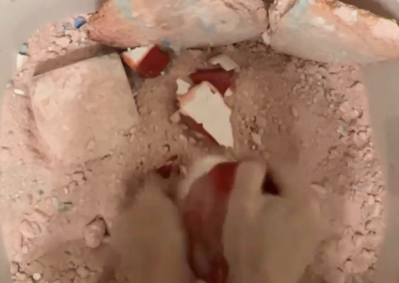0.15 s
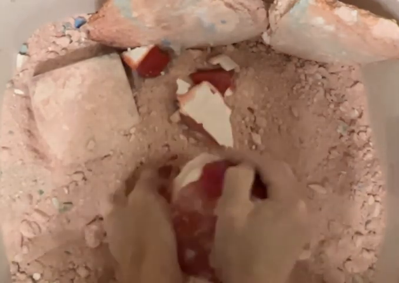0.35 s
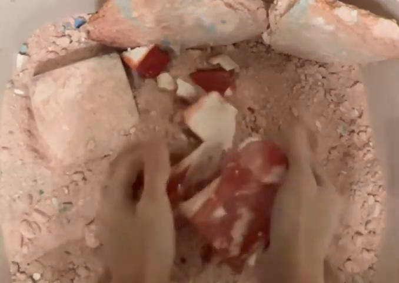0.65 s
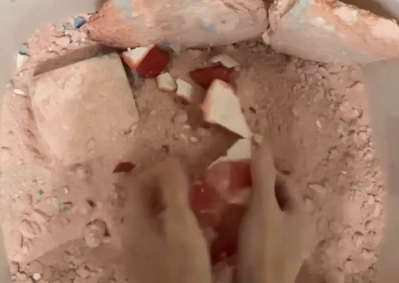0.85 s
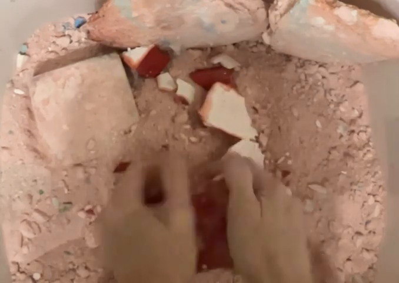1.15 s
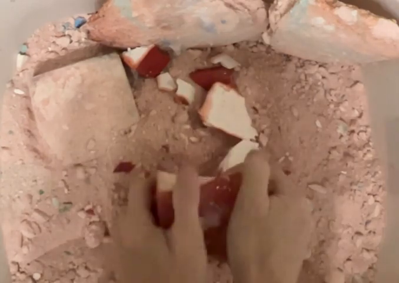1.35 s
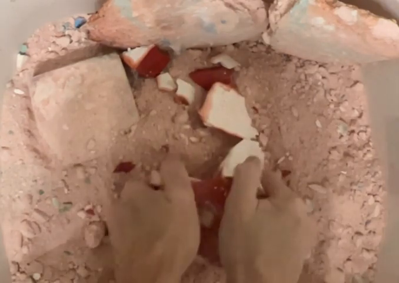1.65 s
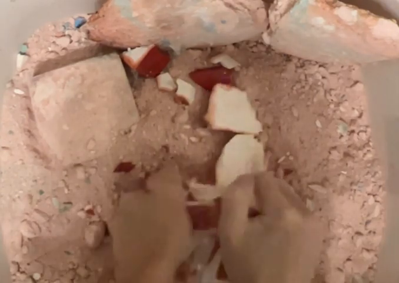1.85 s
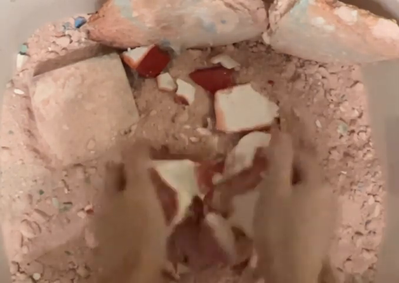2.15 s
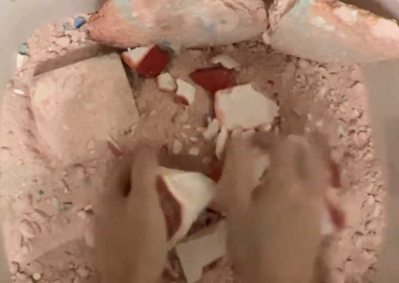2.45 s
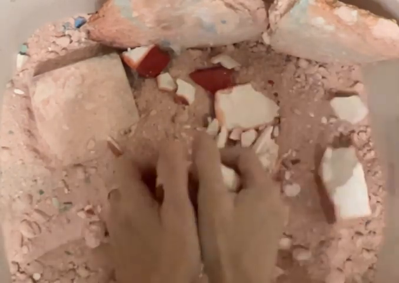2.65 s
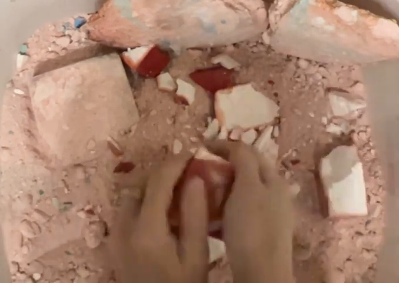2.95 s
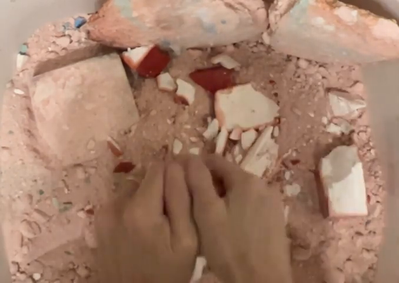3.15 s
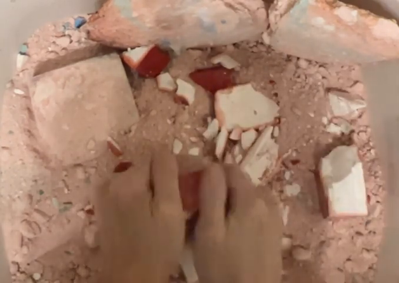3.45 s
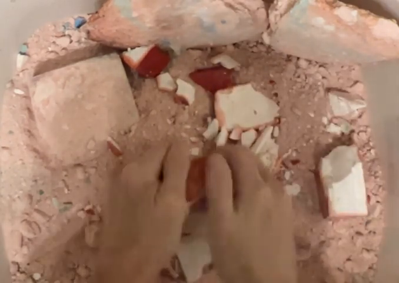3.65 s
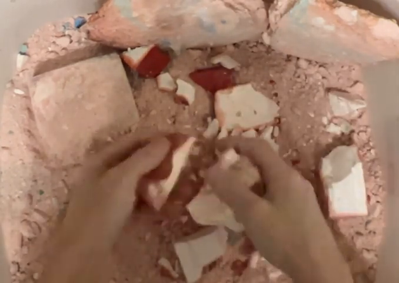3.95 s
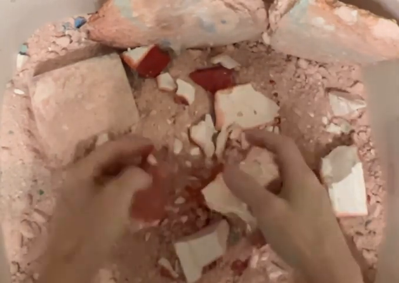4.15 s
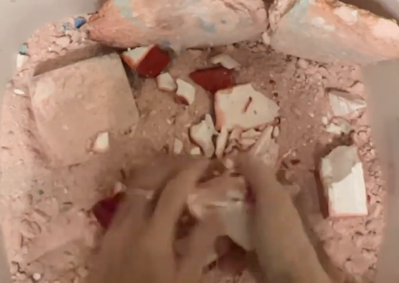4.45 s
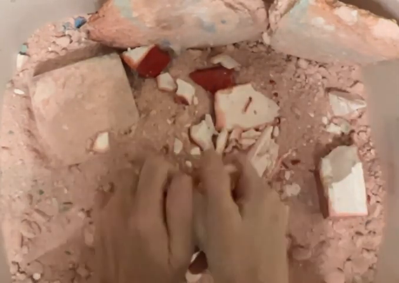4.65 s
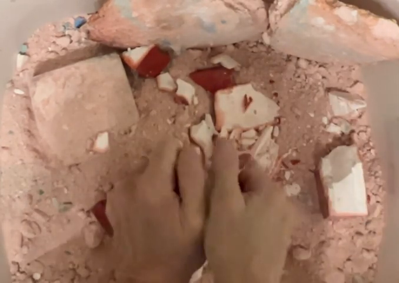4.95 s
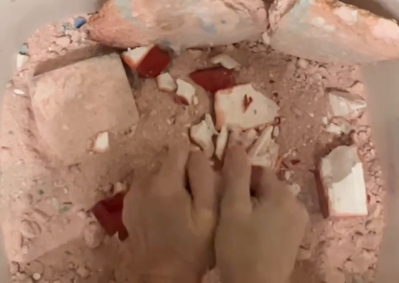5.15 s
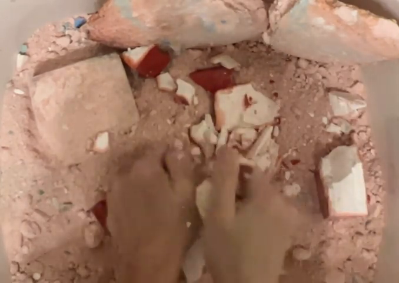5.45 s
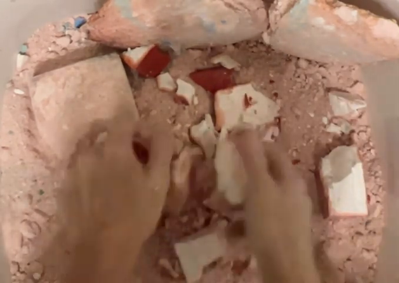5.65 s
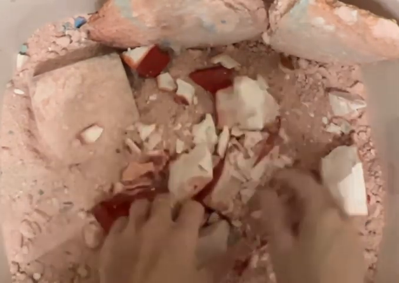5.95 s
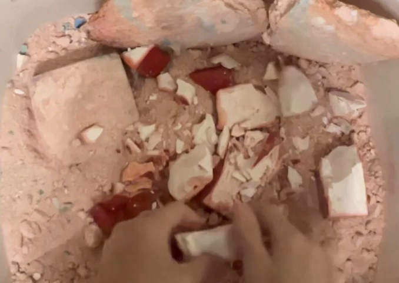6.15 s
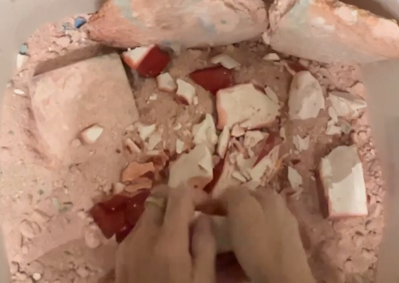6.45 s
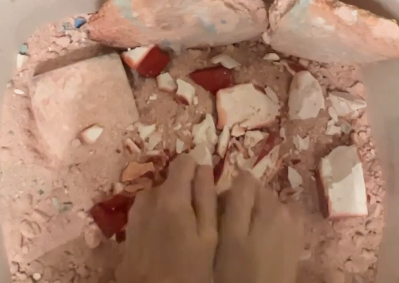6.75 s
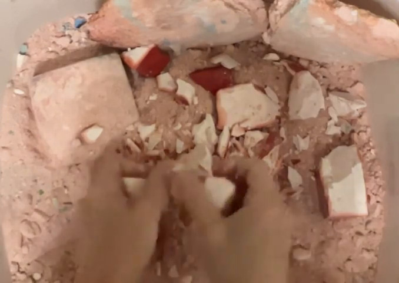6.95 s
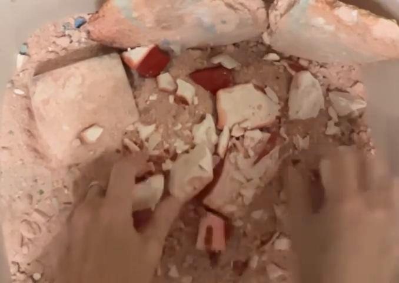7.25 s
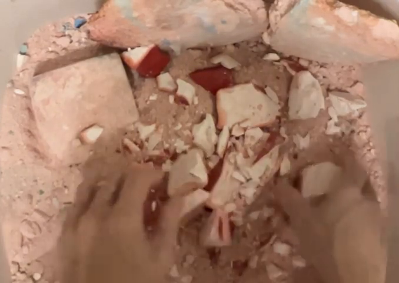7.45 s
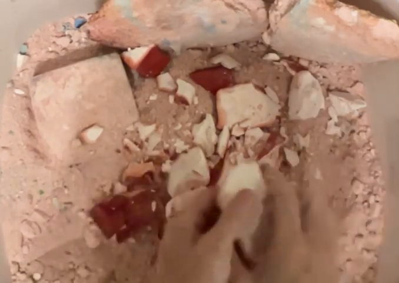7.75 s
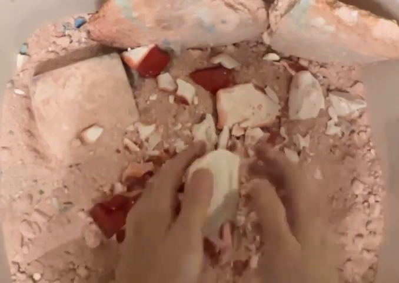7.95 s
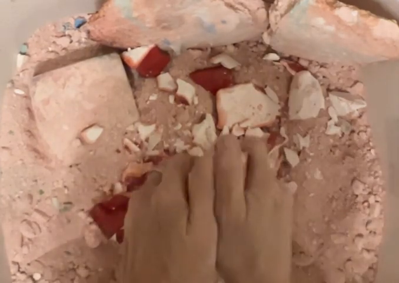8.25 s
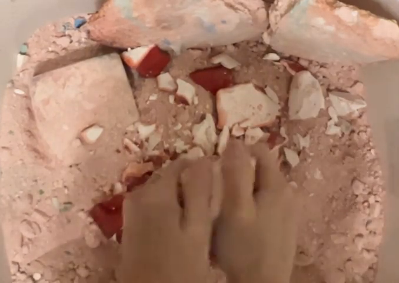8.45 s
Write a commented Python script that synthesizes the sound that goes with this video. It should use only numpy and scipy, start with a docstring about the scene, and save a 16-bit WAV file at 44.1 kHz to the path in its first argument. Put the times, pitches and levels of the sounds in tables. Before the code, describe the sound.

Chalk blocks crack and crumble between fingers, with small ticks, powdery rustles and dull knocks over a faint hum.

```python
"""Breaking chalk by hand

Close under a microphone, hands snap and crumble blocks of chalk over a tub of loose powder.
Each brittle fracture excites the modes of block and tub and sheds crumbs; pieces land with dull
knocks. Fingers rustle the dust and once draw a faint squeak. Moving air buffets the microphone
over a faint mains hum and the hiss of the room."""
import sys
import numpy as np
from scipy import signal
from scipy.fft import rfft, irfft, next_fast_len
from scipy.io import wavfile
from scipy.ndimage import uniform_filter1d

SR = 44100
rng = np.random.default_rng(int(sys.argv[2]) if len(sys.argv) > 2 else 0)


def log_audio(samples):
    """Write samples as a 16-bit WAV file to the path given in sys.argv[1]."""
    # one column per channel
    frames = np.atleast_2d(samples).T
    # limit to full scale, then quantise
    limited = np.clip(frames, -1, 1)
    pcm = np.round(limited * 32767).astype(np.int16)
    wavfile.write(sys.argv[1], SR, pcm)


N = 379260
CONTROL_STEP, EVENT_SAMPLES = 96, 8192  # samples per control value and per snap or knock


def gain_of(db):
    """The decibel law: a factor of ten in amplitude for every 20 dB."""
    return 10 ** (np.asarray(db) / 20)

def unit_rms(x):
    """Normalisation to unit mean power."""
    return x / np.sqrt(np.mean(x ** 2) + 1e-20)

def unit_peak(x):
    """Normalisation to unit power in the loudest 4 ms."""
    return x / np.sqrt(uniform_filter1d(x ** 2, 180).max())

def curve(rows, column):
    """Linear interpolation of one column over the times in the first."""
    rows = np.vstack(rows)
    return np.interp(np.arange(N) / SR, rows[:, 0], rows[:, column])

def upsample(control):
    return np.interp(np.arange(N) / CONTROL_STEP, np.arange(len(control)), control)

def wander(cutoff_hz):
    """Random modulation: low-passed noise of unit power."""
    lowpass = signal.butter(N=2, Wn=cutoff_hz, fs=SR, output="sos")
    return unit_rms(signal.sosfilt(lowpass, rng.standard_normal(N)))

def colour(x, spectrum):
    """Spectral shaping through (Hz, dB) points, silent beyond their ends."""
    size = next_fast_len(len(x) + 256)
    hz = np.fft.rfftfreq(size, 1 / SR)
    points_hz, points_db = np.transpose(spectrum)
    db = np.interp(np.log(hz + 1), np.log(points_hz + 1), points_db)
    inside = (hz > points_hz[0]) & (hz < points_hz[-1])
    return irfft(rfft(x, size) * gain_of(db) * inside, size)[:len(x)]

def resonate(x, hz, width_hz):
    """A damped mode: a two-pole resonator, whose bandwidth sets its decay."""
    radius = np.exp(-np.pi * width_hz / SR)
    return signal.lfilter([1, 0, -1], [1, -2 * radius * np.cos(2 * np.pi * hz / SR), radius ** 2], x)

def ring(x, modes, detune):
    """Modal superposition: one force drives several resonances in parallel."""
    return sum(gain_of(db) * resonate(x, hz * ratio, width)
               for (hz, width, db), ratio in zip(modes, detune))


# Room hiss. Each row: frequency in Hz, relative spectral density in dB.
HISS_SPECTRUM = [(62, -31.5), (105, -9), (294, -14.5), (791, -23.5), (1370, -31), (1550, -29),
                 (2310, -38), (12700, -48), (16000, -49)]
HUM_HZ, HUM_DB, HISS_DB = 120.3, -60.5, -63

def room():
    """The noise floor: a slightly wavering mains hum over stationary hiss."""
    cycles = np.cumsum(HUM_HZ + 0.2 * wander(9)) / SR
    hum = np.sqrt(2) * gain_of(HUM_DB + 0.48 * wander(3.1)) * np.sin(2 * np.pi * cycles)
    return hum + gain_of(HISS_DB) * unit_rms(colour(rng.standard_normal(N), HISS_SPECTRUM))


# Eddies at the microphone. Each row: frequency in Hz, relative spectral density in dB.
EDDY_SPECTRUM = [(8.8, -28.5), (15, -7), (38, 4), (64, -1), (122, -6), (201, -29), (300, -34.5), (390, -62),
                 (660, -120)]
# Air between gusts. Each row: time in seconds, level in dB.
DRAUGHT = [(0.0, -74.5), (0.95, -65.5), (1.05, -78.5), (1.5, -72), (1.7, -54.5), (2.6, -57.5), (4.3, -57),
           (4.5, -66.5), (5.0, -71.5), (5.8, -74), (6.2, -60), (6.65, -61), (6.9, -45), (8.35, -50),
           (8.5, -67.5)]
# Gusts from the moving hands. Each row: peak time in seconds, level in dB,
# seconds to rise or fall by 20 dB (taken as at least 0.04).
GUSTS = [(1.93, -36.5, .06), (2.14, -41, 0.2), (2.8, -43, 0.14), (3.03, -33, 0.07), (3.21, -36.5, 0.16),
         (3.52, -42.5, 0.14), (3.73, -37, 0.09), (3.931, -35.5, 0.23), (4.099, -42.5, 0.06),
         (4.27, -43, .05), (4.38, -44.5, 0.15), (5.91, -54, 0), (6.25, -48, 0.48), (6.455, -33, 0.04),
         (6.96, -36, 0.02), (7.069, -28, -0.015), (7.395, -30.5, 0.04), (7.58, -41.5, 0.33),
         (7.701, -33, 0.01), (8.01, -40, 0.2), (8.12, -46.5, 0.4), (8.27, -39.5, .07), (8.391, -41, -0.06)]
# Lulls in the air. Each row: centre in seconds, depth in dB, half length in seconds.
LULLS = [(3.424, 13, 0.024), (7.942, 16, 0.05)]

def air():
    """Turbulence: low pressure swings at the microphone port swell and brighten with each gust."""
    eddies = colour(rng.standard_normal(N), EDDY_SPECTRUM)
    steady = eddies / np.sqrt(uniform_filter1d(eddies ** 2, 3500) + 1e-12)
    t = np.arange(0, N + CONTROL_STEP, CONTROL_STEP) / SR
    gust_power = sum(gain_of(db - 20 * abs(t - at) / max(fall_s, .04)) ** 2 for at, db, fall_s in GUSTS)
    lull_db = sum(db * np.exp(-((t - at) / half_s) ** 2) for at, db, half_s in LULLS)
    level = np.sqrt(gain_of(curve(DRAUGHT, column=1)) ** 2 + upsample(gust_power))
    flutter = signal.sosfilt(signal.butter(N=2, Wn=75, btype="high", fs=SR, output="sos"), steady)
    brightening = 0.5 * ((level / gain_of(-34)) ** 0.24 - .7)
    pressure = unit_rms(steady) + brightening * unit_rms(flutter)
    return level * gain_of(2.8 * wander(14) - upsample(lull_db)) * pressure


def squeak(start_s=2.87, end_s=3.2, from_hz=1120, to_hz=1660, level_db=-67.5):
    """Friction of skin on chalk: a rising tone, made breathy by random amplitude modulation."""
    progress = np.clip((np.arange(N) / SR - start_s) / (end_s - start_s), 0, 1)
    cycles = np.cumsum(from_hz + (to_hz - from_hz) * progress) / SR
    envelope = gain_of(level_db) * np.sqrt(np.sin(np.pi * progress).clip(0))
    return envelope * (1 + .5 * wander(cutoff_hz=86)) * np.sin(2 * np.pi * cycles)


def grains(per_s, spread_db, clump_db):
    """Shot noise: tiny contacts of uneven size, swelling in clumps."""
    size = gain_of(spread_db * rng.exponential(1, N).clip(0, 5)) * rng.standard_normal(N)
    return size * (rng.random(N) < per_s / SR) * gain_of(clump_db * wander(35))

def patchy(x, depth_db):
    """Spectral modulation: random patches of time and frequency are lifted or lowered."""
    _, _, spectra = signal.stft(x, SR, nperseg=256)
    across_pitch = uniform_filter1d(rng.standard_normal(spectra.shape), 4, axis=0)
    patches = unit_rms(uniform_filter1d(across_pitch, 16, axis=1))
    return signal.istft(spectra * gain_of(depth_db * patches), SR, nperseg=256)[1][:N]

def grit(activity, per_s=220):
    """A Poisson process: single grains tick on random pitches, louder where the hands are busy."""
    out, t = np.zeros(N), np.arange(300) / SR
    impacts = gain_of(4.2 * rng.exponential(1, N).clip(0, 3)) * (rng.random(N) < per_s / SR) * activity
    pitch_index = rng.integers(0, 16, N)
    envelope = np.exp(-t / .0005) * np.minimum(t / .0002, 1)
    for k, hz in enumerate(np.geomspace(1100, 7500, num=16)):
        tick = envelope * (np.sin(2 * np.pi * hz * t) + .3 * rng.standard_normal(len(t)))
        out += signal.oaconvolve(impacts * (pitch_index == k), tick)[:N]
    return out

def burst_power(start_s, length_s, level_db, attack_s, release_db_per_s):
    """Incoherent addition: the summed power of attack-hold-release envelopes."""
    t = np.arange(0, N + CONTROL_STEP, CONTROL_STEP)[:, None] / SR - start_s
    envelope_db = level_db - release_db_per_s * np.maximum(t - length_s, 0)
    envelopes = gain_of(envelope_db) * np.clip(t / attack_s, 0, 1)
    return upsample((envelopes ** 2).sum(axis=1))

# Fingers resting in the dust. Each row: time in seconds, dust level in dB, crumb level in dB.
RESTING_CONTACT = [(0.0, -66, -64.5), (0.5, -71, -68.5), (0.68, -68.5, -57.5), (0.95, -62, -61),
                   (1.37, -72, -73), (1.7, -69, -65), (2.2, -71, -62.5), (2.5, -72.5, -71.5),
                   (3.15, -69.5, -65), (3.3, -76, -69), (3.9, -65.5, -65), (4.4, -75.5, -71.5),
                   (4.85, -75.5, -63.5), (5.6, -73, -67), (6.1, -71.5, -65.5), (7.2, -76.5, -68),
                   (7.62, -77.5, -75), (8.0, -67.5, -71), (8.6, -78, -71)]
# Rubs and squeezes. Each row: start and length in seconds, dust level in dB, crumb level in dB.
RUBS = [(0.84, 0.013, -57.5, -60), (0.973, 0.074, -65, -62), (1.037, 0.13, -51, -86),
        (1.249, 0.077, -57.5, -65), (1.396, 0.12, -61, -66), (1.56, 0.051, -57, -57.5),
        (2.04, 0.042, -66, -73), (2.21, 0.034, -65, -58.5), (2.326, 0.046, -63, -53),
        (2.537, 0.054, -65.5, -74), (2.61, 0.024, -61.5, -68.5), (2.758, 0.084, -62.5, -80),
        (2.912, .13, -65, -79), (3.066, .11, -63.5, -63.5), (3.721, 0.021, -62.5, -67.5),
        (3.854, 0.069, -63, -67.5), (4.237, 0.077, -75.5, -58), (4.463, 0.017, -57, -73),
        (4.544, 0.023, -59.5, -81.5), (4.721, .07, -65, -61.5), (4.813, 0.029, -61, -64),
        (5.072, 0.048, -64.5, -57.5), (5.675, 0.11, -61, -60.5), (5.926, 0.051, -77, -61.5),
        (6.186, 0.019, -66, -60.5), (6.247, 0.13, -68, -74.5), (6.393, 0.026, -57, -69),
        (6.576, 0.045, -61.5, -61.5), (6.774, 0.07, -67, -59.5), (6.857, 0.04, -62, -64.5),
        (6.972, 0.04, -56.5, -68.5), (7.132, 0.039, -76.5, -57.5), (7.31, 0.072, -57, -52),
        (7.402, 0.11, -61.5, -59), (7.727, 0.015, -50.5, -65.5), (7.776, 0.04, -60.5, -64.5),
        (7.996, 0.032, -63.5, -70.5), (8.088, 0.02, -62.5, -68.5), (8.228, 0.011, -57.5, -60),
        (8.28, 0.065, -61.5, -69), (8.444, 0.043, -63, -61)]

def rustle_level(column, debris_db):
    """Power summation of resting contact, rubs and debris, whose level is relative to each snap."""
    rubs, breaks = np.transpose(RUBS), np.transpose(SNAPS)
    rubbing = burst_power(rubs[0], rubs[1], rubs[column + 1], attack_s=0.008, release_db_per_s=526)
    debris = burst_power(breaks[0], 0.029, breaks[1] + debris_db, attack_s=0.0054, release_db_per_s=131)
    return np.sqrt(gain_of(curve(RESTING_CONTACT, column)) ** 2 + rubbing + debris)

# Fine dust and coarse crumbs. Each row: frequency in Hz, relative spectral density in dB.
DUST_SPECTRUM = [(1470, -36.5), (2500, -8), (5150, -6), (5750, 0), (7300, -4.5), (9510, -3), (13000, -6),
                 (15500, -9), (16500, -17)]
CRUMB_SPECTRUM = [(200, -17.5), (450, 4), (1000, -1.5), (2200, -4), (3500, -5.5), (6000, -20.5)]

def rustle():
    """Granular noise: dust hisses between the fingers and crumbs patter on the powder bed."""
    dust = colour(patchy(grains(12000, spread_db=2.5, clump_db=1.8), depth_db=3), DUST_SPECTRUM)
    crumbs = colour(patchy(grains(7000, spread_db=2.8, clump_db=2.2), depth_db=3), CRUMB_SPECTRUM)
    dust_level = rustle_level(column=1, debris_db=-45.5)
    crumb_level = rustle_level(column=2, debris_db=-43.5)
    ticks = gain_of(1.5) * grit(.5 * dust_level + crumb_level)
    return dust_level * unit_rms(dust) + crumb_level * unit_rms(crumbs) + ticks


def knock(level_db, hz, t60):
    """A soft impact: a blunt, lumpy force excites three low modes of the powder bed."""
    cycles = np.arange(EVENT_SAMPLES) / SR * hz  # a bigger piece settles more slowly
    quarter_period = int(SR / hz / 4)
    noise = rng.standard_normal(EVENT_SAMPLES)
    lumps = unit_rms(uniform_filter1d(uniform_filter1d(noise, quarter_period), quarter_period))
    push = 1.4 * cycles * np.exp(-cycles / 0.29)
    settling = 0.388 * lumps * np.exp(-cycles / 2.0) * np.minimum(cycles / 1.6, 1)
    width_hz = 2.2 / t60
    modes = [(hz, width_hz, 0), (hz * 1.36, width_hz * 2.04, -2.5), (hz * 2.2, width_hz * 3, -14)]
    bed = sum(gain_of(db) * unit_peak(resonate(push + settling, f, width)) for f, width, db in modes)
    return gain_of(level_db - 8.0) * unit_peak(bed)

def place(sound, events):
    """Linear superposition: one sound for each row, added at its start time."""
    out = np.zeros(N + EVENT_SAMPLES)
    for start_s, *settings in events:
        out[round(start_s * SR):][:EVENT_SAMPLES] += sound(*settings)
    return out[:N]

# Knocks on the bed. Each row: start in seconds, relative level in dB,
# frequency of the lowest mode in Hz, its 60 dB decay time in seconds.
KNOCKS = [(0.963, -35.5, 604, 0.015), (1.963, -36.5, 397, 0.038), (2.228, -43.5, 556, 0.017),
          (2.256, -42, 760, 0.014), (2.416, -45.5, 620, 0.01), (2.695, -28, 354, 0.033),
          (3.45, -17.5, 474, 0.032), (4.252, -43.5, 774, 0.042), (5.219, -37, 660, 0.01),
          (5.296, -18.5, 450, 0.024), (5.798, -38, 443, 0.019), (5.925, -35, 438, 0.021),
          (7.154, -31.5, 435, 0.02), (7.24, -39, 385, 0.033), (7.314, -15.5, 314, 0.063),
          (7.338, -31.5, 328, 0.04)]

def knocks():
    """Impact excitation: dropped pieces and hard breaks jolt the powder bed."""
    return place(knock, KNOCKS)


# Modes of the block, and of the tub with its powder. Each row: frequency and width in Hz, gain in dB.
CHALK_MODES = [(1650, 130, -6.5), (2130, 400, 9), (3040, 530, 6), (4460, 540, -15)]
TUB_MODES = [(343.8, 710, 4), (450, 47, -2.5), (697, 87, -4)]
# The bright hiss of a crack. Each row: frequency in Hz, relative spectral density in dB.
CRACK_SPECTRUM = [(2500, -20.5), (4500, -2), (7000, -6.5), (10000, -8.5), (14000, -10), (17000, -11.5)]
FRACTURE_S, FRACTURE_EXPONENT = 0.0032, 0.46  # fracture time of a 1500 Hz piece; smaller ones part faster

def snap(level_db, hz, bright_db):
    """Brittle fracture: a run of tiny breaks, then falling crumbs; both hiss and ring block and tub."""
    t = np.arange(EVENT_SAMPLES) / SR
    fracture_s = FRACTURE_S / (hz / 1500) ** FRACTURE_EXPONENT
    fracture = (1 - np.exp(-t / 0.00035)) * np.exp(-(t / fracture_s) ** 1.154)
    spurts = gain_of(unit_rms(uniform_filter1d(rng.standard_normal(len(t)), 120)))
    landing = gain_of(-23.5 - 0.2 * level_db) * (1 - np.exp(-t / 0.0034)) * spurts
    showers = np.array([landing * gain_of(-60 * t / t60) for t60 in (.16, .18, .13)])
    uneven = gain_of(5.7 * rng.exponential(1, len(t)).clip(0, 3))
    noise = rng.standard_normal((3, len(t)))
    block_force, tub_force, crack_force = noise * (uneven * fracture + 2 * np.sqrt(uneven) * showers)
    block_detune, tub_detune = rng.uniform(.92, 1.0, (2, len(CHALK_MODES)))  # pieces vary in size

    # A chip rings mostly on its own pitch; a hard break shakes the whole block.
    piece = unit_peak(resonate(noise[0] * uneven * fracture, hz, width_hz=400))
    coupling = np.clip(1 + level_db / 42, .3, 1)
    body = unit_peak(ring(block_force, CHALK_MODES, block_detune))
    crumbs = unit_peak(colour(block_force, CRUMB_SPECTRUM))
    block = piece + coupling * (1.7 * body + 0.4 * crumbs)
    tub = ring(tub_force, TUB_MODES, tub_detune)
    crack = colour(crack_force, CRACK_SPECTRUM)

    shake_db = -1.3 * max(bright_db + 15.5, 0)  # the brightest ticks hardly move the block
    jolt_db = -20.5 + 0.044 * level_db  # harder breaks jolt the tub more
    parts = (block, shake_db - 10.5), (tub, shake_db + jolt_db), (crack, bright_db + 0.5)
    return sum(gain_of(level_db + db) * unit_peak(part) for part, db in parts)

# Snaps and ticks. Each row: start in seconds, nominal level in dB,
# ringing frequency of the piece in Hz, relative level of the bright crack in dB.
SNAPS = [(0.1067, -37, 2870, -11), (0.1796, -2, 1460, -16.5), (0.1913, -11.5, 1800, -23),
         (0.2062, -17.5, 1720, -16.5), (0.256, -30, 1240, -21), (0.438, -38.5, 2090, -27),
         (0.5654, -37, 1350, -12.5), (0.7612, -45, 4540, -20), (0.9641, -36, 1240, -34),
         (1.2149, -39, 3500, -12), (1.2252, -35, 3500, -13), (1.72, -38, 3400, -14),
         (1.734, -47, 3250, -13), (1.7572, 3, 3120, -18.5), (1.7631, -4.5, 2110, -15),
         (1.774, -14, 3300, -17), (1.8538, -21.5, 4730, -11.5), (1.916, -38, 910, -27),
         (1.9631, -25, 1510, -34), (2.062, -38, 3570, -25), (2.1838, -43, 2980, -17.5),
         (2.208, -36.5, 3440, -13), (2.231, -34.5, 2390, -12.5), (2.338, -32, 2590, -22),
         (2.3526, -34.5, 3150, -14.5), (2.403, -41, 3970, -17), (2.4433, -44, 2230, -16),
         (2.6954, -39, 1650, -33.5), (3.237, -46, 5500, -9.5), (3.4528, -8, 1570, -12.5),
         (3.463, -18.5, 1690, -22), (3.479, -19, 2000, -12), (3.4939, -14.5, 1620, -20),
         (3.501, -19, 1980, -12.5), (3.556, -28, 3070, -11.5), (3.6091, -23.5, 2120, -13.5),
         (3.8759, -33, 4470, -10), (3.9301, -44.5, 3070, -11.5), (4.255, -33.5, 1695, -40.5),
         (4.7298, -44.5, 2830, -17), (4.822, -36, 2680, -12.5), (4.8528, -35.5, 2320, -13.5),
         (4.867, -38.5, 2400, -13), (4.9132, -38.5, 3600, -11.5), (4.928, -44, 3020, -11),
         (4.9728, -34, 2320, -10.5), (5.0051, -50.5, 3500, -9), (5.078, -21, 1620, -13),
         (5.103, -38, 1640, -12.5), (5.183, -41, 3010, -11), (5.217, -42, 895, -13),
         (5.2992, -8, 1530, -18), (5.325, -21.5, 2340, -14), (5.3424, -22, 2400, -17),
         (5.497, -37.5, 1090, -13), (5.6625, -43.5, 3000, -15), (5.699, -36.5, 1940, -13),
         (5.737, -34.5, 3070, -16), (5.7519, -34.5, 1500, -39), (5.7962, -33, 2430, -14),
         (5.8275, -39, 3000, -11.5), (5.897, -35.5, 3770, -35), (5.9241, -28.5, 1470, -41.5),
         (6.142, -45.5, 1100, -28), (6.5858, -41.5, 2800, -14.5), (6.6256, -37, 2150, -32),
         (6.638, -25.5, 3240, -21), (6.6507, -18.5, 3050, -15), (6.8016, -34, 2310, -17),
         (7.1566, -33.5, 870, -42.5), (8.296, -24, 2930, -14), (8.377, -39, 2500, -19),
         (8.393, -34.5, 2770, -20.5), (8.4537, -38.5, 2780, -17), (8.4624, -31, 2780, -11.5),
         (8.483, -36, 2960, -30), (8.493, -28, 2500, -38), (8.5348, -38.5, 2860, -13.5),
         (8.5553, -41, 5550, -16.5)]

def snaps():
    """Impulsive excitation: the chalk breaks in loud snaps and small ticks."""
    return place(snap, SNAPS)


def scene():
    """Superposition of all sources in one channel."""
    return (snaps() + knocks() + rustle() + air() + room() + squeak())[None]

def record(dry):
    """Hard clipping at full scale, then band limiting by a low-pass filter."""
    lowpass = signal.firwin(511, cutoff=15900, window=("kaiser", 9), fs=SR)
    return signal.oaconvolve(np.clip(dry, -1, 1), lowpass[None], "same")


dry = scene()
out = record(dry)
log_audio(out)
```